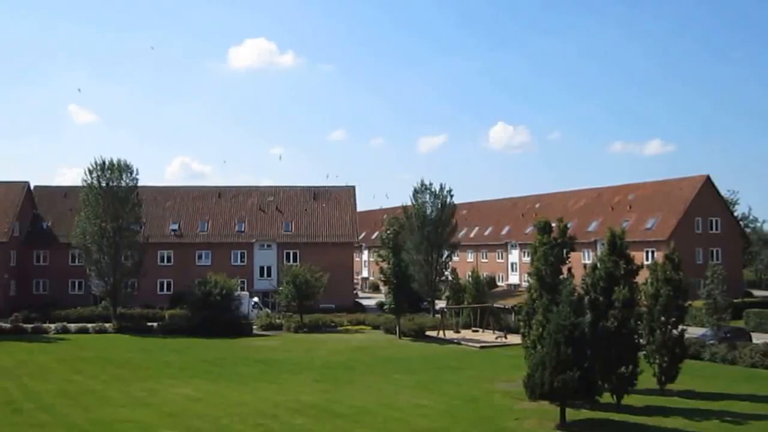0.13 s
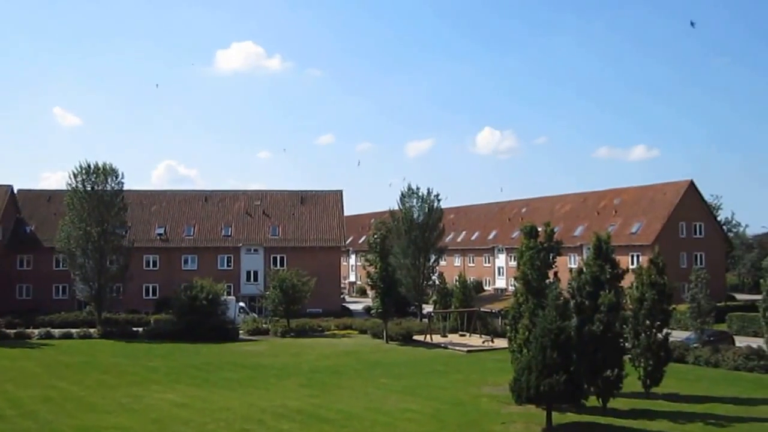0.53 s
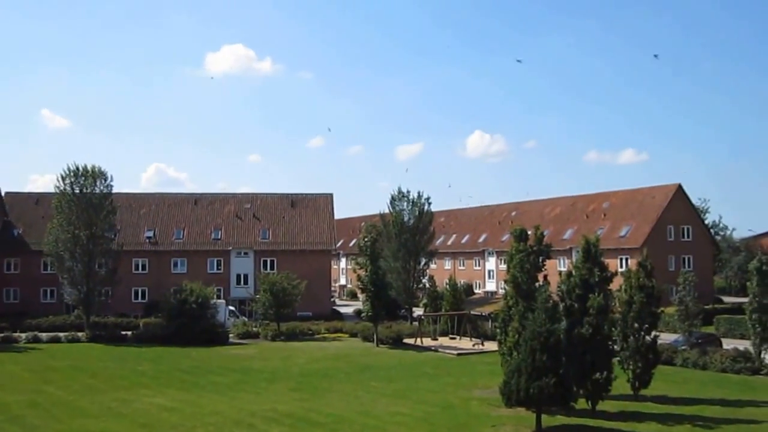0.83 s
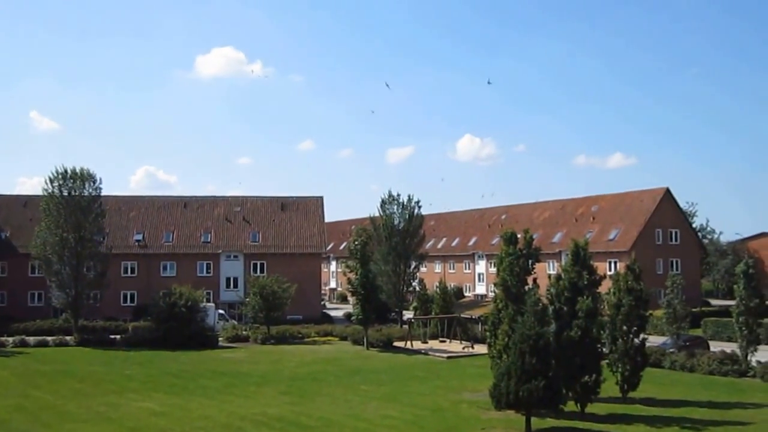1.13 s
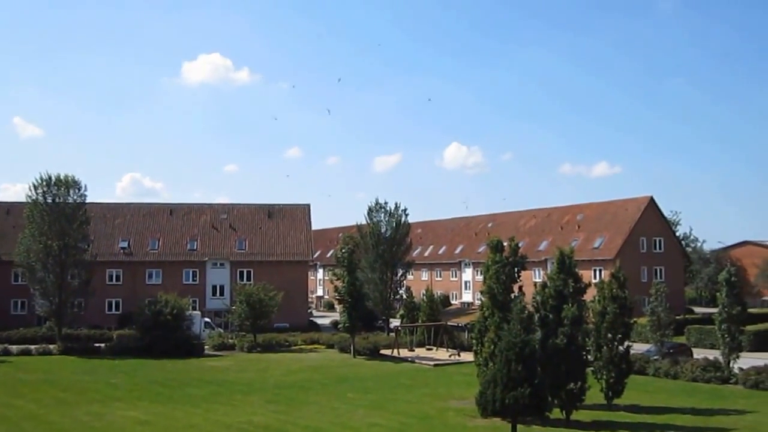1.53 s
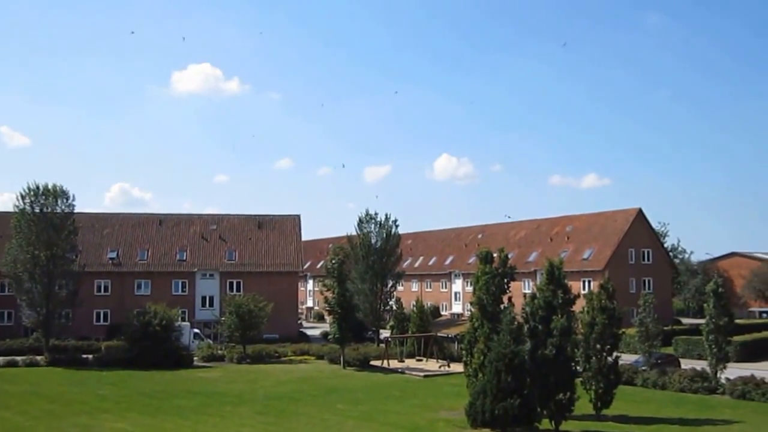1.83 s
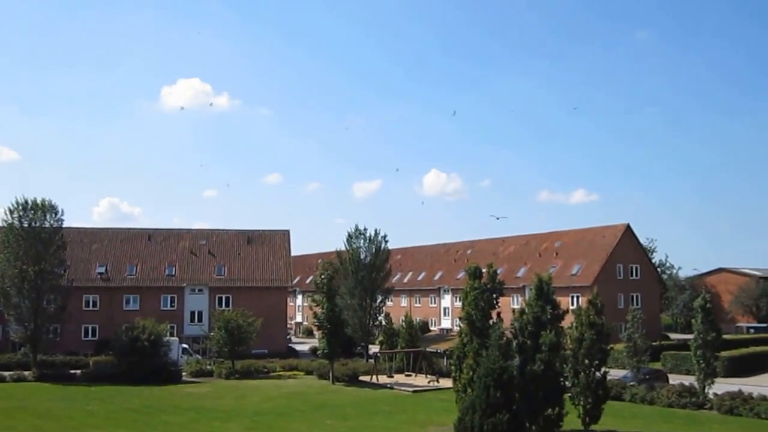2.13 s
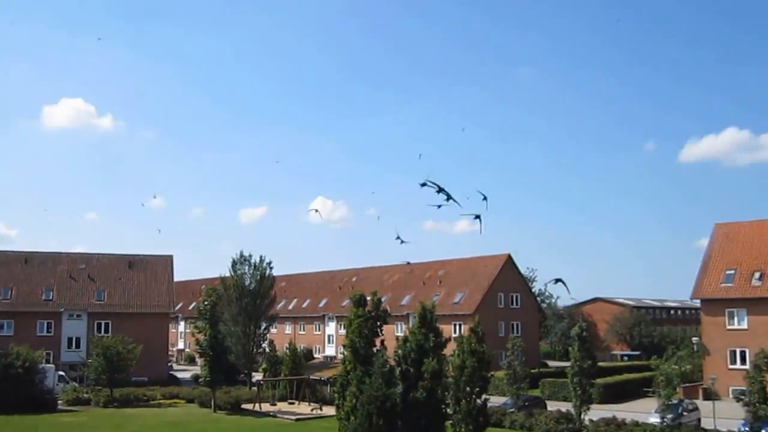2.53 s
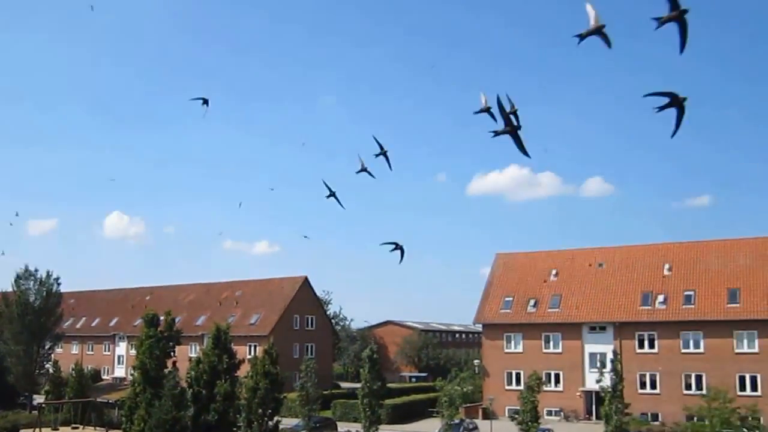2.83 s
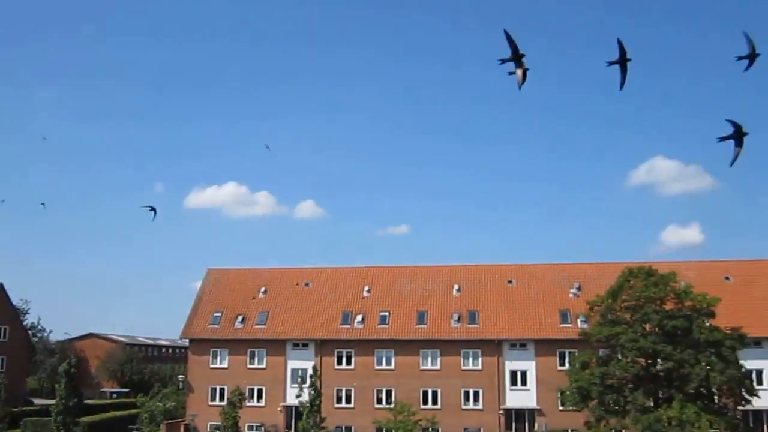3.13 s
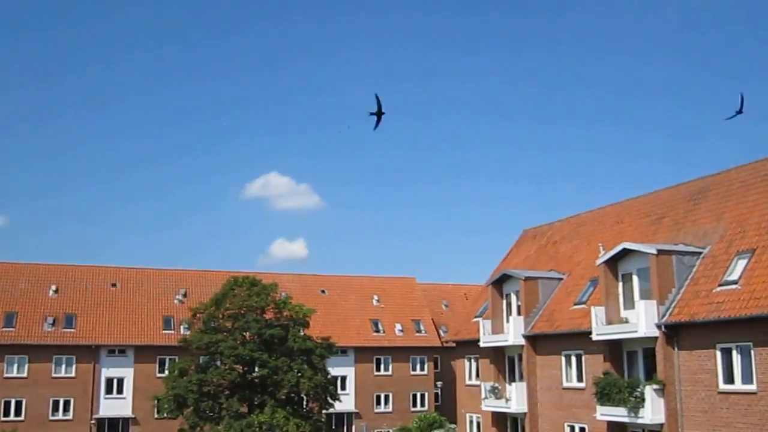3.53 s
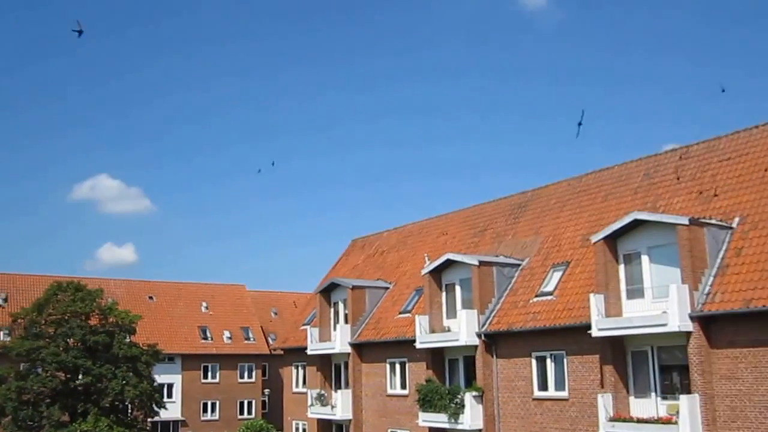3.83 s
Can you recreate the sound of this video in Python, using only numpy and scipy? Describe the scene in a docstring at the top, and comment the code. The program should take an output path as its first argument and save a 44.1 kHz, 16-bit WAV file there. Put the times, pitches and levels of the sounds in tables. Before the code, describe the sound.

Swifts scream shrilly close overhead while wind buffets the microphone over distant traffic.

```python
"""Shrill screams race across a courtyard as a flock of swifts passes close overhead.
Each scream scoops up to a whistle, trills by frequency and amplitude modulation, and breaks into a
falling stutter; the nearest birds add sharp chips. The lawn reflects the calls and the house fronts
echo them. Turbulent wind buffets the microphone over a wash of distant traffic."""
import sys
import numpy as np
from scipy import signal
from scipy.fft import rfft, irfft
from scipy.io import wavfile
from scipy.ndimage import map_coordinates

SR = 44100
rng = np.random.default_rng(int(sys.argv[2]) if len(sys.argv) > 2 else 0)


def dump(signal):
    """Clip the signal to [-1, 1] and save it as 16-bit WAV at the path in sys.argv[1]."""
    limited = np.clip(np.atleast_2d(signal).T, -1, 1)
    pcm = np.round(limited * 32767).astype(np.int16)
    wavfile.write(sys.argv[1], SR, pcm)


N = 176400

# Spectrum of the distant traffic (frequency [Hz], gain [dB])
TRAFFIC_SPECTRUM = [(20, 17), (90, 2), (160, 4), (300, -3), (550, 1.5), (950, 2), (1350, 2.5), (2230, -7),
                    (2700, -10.5), (3800, -13.5), (7000, -20.5), (11000, -34.5), (16000, -42)]
# Level of the distant background, ducked by the recorder's gain control after a wind hit and during
# the loudest screams (time [s], level [dB])
DUCKED_BACKGROUND_LEVEL = [(.04, -44.5), (.2, -41), (.66, -40.5), (.70, -42.5), (1.8, -42), (2.22, -40.5),
                           (2.29, -44), (2.52, -41), (2.64, -49), (2.95, -48), (3.15, -44), (3.42, -39.5),
                           (3.5, -41.5), (4, -41.5)]
# Hum and whine in the traffic (frequency [Hz], bandwidth [Hz], level [dB])
WHINE_BANDS = [(86, 14, -51.5), (692, 45, -51.5), (1201, 110, -51)]
# Strength of the wind on the microphone (time [s], relative level [dB])
GUST_LEVEL = [(.04, -55), (.16, -43), (.5, -52), (.68, -37.5), (.85, -35.5), (1.05, -29.5), (1.26, -29),
              (1.34, -36.5), (1.43, -17), (1.57, -33.5), (1.88, -33.5), (1.96, -24.5), (2.1, -38),
              (2.26, -23.5), (2.55, -33.5), (2.78, -40), (2.95, -49), (3.2, -48.5), (3.33, -34),
              (3.52, -40.5), (3.64, -19.5), (3.75, -36), (3.81, -23), (3.9, -39.5), (4, -18)]
# Spectrum of the wind rumble (frequency [Hz], gain [dB])
RUMBLE_SPECTRUM = [(15, -5.5), (35, 7.5), (70, 4), (120, -5), (200, -18), (300, -14), (500, -41),
                   (1000, -43), (8000, -130)]
# Spectrum of the small eddies (frequency [Hz], gain [dB])
EDDY_SPECTRUM = [(30, -3.5), (100, -3), (190, 0), (300, -12), (450, -20), (800, -35), (1500, -79),
                 (8000, -130)]
# Single pressure pulses of the wind (time [s], peak level [dB], width [ms])
BUFFETS = [(0.691, -18, 3.2), (1.013, -23.5, 1.15), (1.162, -15.5, 0.81), (1.274, -16.5, 2.3),
           (1.408, -10, 1.8), (1.4309, -12, 1.2), (1.4344, -9, .9), (1.439, -9.5, 0.81), (1.531, -15, 1.52),
           (1.765, -22, 2.4), (1.954, -20, 2.9), (2.265, -11, 1.07), (2.743, -22, 1.18),
           (3.612, -2.5, 1.08), (3.651, -18, 0.94), (3.696, -13, 0.89), (3.715, -19.5, 0.93),
           (3.782, -21, 1.2), (3.802, -10.5, 1.07), (3.834, -12, 1.5), (3.959, -16, 1.01)]
# Harmonics 1 to 5 of the voice; the second is the heard pitch (relative level [dB])
PARTIALS_DB = [-37, -2, -25.5, -22.5, -43]
# Spectrum of the breath hiss (frequency [Hz], gain [dB])
BREATH_SPECTRUM = [(2000, -14), (2900, -1.5), (3700, 0.5), (4600, 0.5), (5800, -11.5), (7300, 13.5),
                   (9000, -14.5), (10300, 3.5), (12300, -3), (14000, -8), (16000, -24)]
# Resonances of throat and beak (frequency [Hz], gain [dB])
BEAK_RESPONSE = [(2800, -0.5), (3600, -0.5), (4300, 1), (4900, -2.5), (5600, 1), (6450, 2), (7000, -2.5),
                 (7800, 1.5), (9300, 0.5), (10500, 0), (12700, 1), (13700, -6), (15500, -2)]
# Spectrum of the courtyard echo (frequency [Hz], gain [dB])
YARD_RESPONSE = [(2500, 12), (5300, 2.5), (6500, -6), (9000, 1), (12000, -8.5), (15000, -5)]
# Chips of the nearest birds (centre time [s], pitch [Hz], relative level [dB])
CHIPS = [(1.850, 6050, -25), (1.880, 4840, -29), (1.895, 4500, -32), (1.906, 5550, -18.5),
         (2.220, 6000, -17), (2.335, 4480, -31), (2.425, 6350, -17), (2.44, 6240, -19), (2.452, 6150, -18),
         (2.479, 4720, -28), (2.497, 4700, -29), (2.783, 4620, -24), (2.816, 4380, -27.5),
         (2.857, 4780, -29), (2.962, 5000, -31), (2.988, 5500, -41), (3.012, 5250, -32), (3.080, 4090, -29),
         (3.208, 5750, -17.5), (3.234, 5100, -28), (3.643, 6050, -36), (3.656, 6050, -27),
         (3.671, 6000, -27), (3.778, 4800, -32)]
# Screams (start [s], length [s], stutter length [s], pitch [Hz], glide [Hz/s], scoop depth [Hz],
# scoop time [s], trill rate [Hz], relative level [dB], swell [dB/s], odd-partial gain [dB],
# treble gain [dB], echo gain [dB], roughness [0-1])
SCREAMS = [ (-.16, 0.23, 0.042, 6350, -20, 900, 0.018, 264, -40.5, 2, -4, -3, 1.5, .7),
           (0.102, 0.42, 0.13, 5893, -3, 953, 0.04, 265.4, -38.5, -13, 4, -6.5, -3.5, 0.48),
           (0.424, 0.26, 0.011, 5232, 499, 613, 0.017, 268, -35.5, 3, -20, -6, -1.5, 0.41),
           (0.69, 0.16, 0, 6230, 2, 1227, 0.084, 271.7, -26, 43, -1, -1, -13, 0.17),
           (0.788, .255, .11, 6240, -1000, 490, .04, 272, -36.5, 1, -2, 1, -5, 0.38),
           (0.952, 0.27, 0.0063, 5613, -2400, 1222, 0.019, 270.3, -33.5, -13, -11, -0.5, -0.5, 0.09),
           (1.165, .325, 0.017, 5907, 1105, 893, 0.019, 248, -27.5, -8, -3.5, 0.5, -3, 0.2),
           (1.482, 0.39, 0.094, 5867, 1511.5, 1182, .028, 272, -22.5, -12.5, -2.5, 4, -2.5, 0.55),
           (1.526, 0.32, 0.062, 6526, 7.5, 1706, 0.087, 276.7, -24.5, -14, -11, -3, -25, 0.24),
           (1.894, 0.4, 0.024, 6310, -1900, 1400, .016, 278, -21.5, -17, -6, 3.5, -0.5, 0.2),
           (1.934, 0.22, 0.054, 5800, -10, 1300, 0.035, 264.4, -27.5, -9, -2, 4.5, -10, 0.35),
           (2.176, .30, .085, 6458, 14.5, 1694, 0.033, 278, -15.5, -15, -14, 1, -13.5, 0.1),
           (2.215, 0.36, .05, 5676, 1591, 1208, 0.022, 291.4, -25, -25, 3, 0, -19, 0.01),
           (2.487, 0.38, 0.084, 6310, 292, 1700, 0.03, 263, -15.5, -24.5, 3, 3.5, -9.5, 0.45),
           (2.512, 0.4, 0.14, 5750, 289, 785, 0.02, 243, -23, -45, -2, 2, -25, 0.57),
           (2.808, .27, 0.035, 6370, -400, 1393, 0.032, 267.5, -17, -66, -8, 3.5, -8, 0.12),
           (2.884, 0.25, .03, 5754, 384, 1277, 0.016, 258.8, -19, -28, 1, -3, -24, 0.31),
           (3.037, .21, 0.049, 5590, -7, 999, 0.019, 234, -19.5, -28, 2, -3.5, -18, 0.26),
           (3.078, 0.27, 0.044, 5690, 2, 1402, 0.015, 228.7, -25, -41, 3.5, 2.5, -4, 0.53),
           (3.309, 0.075, 0.013, 6430, 0, 710, 0.012, 268, -25.5, 0, -12, -12, 3, 0.47),
           (3.356, 0.31, .09, 5860, 3007, 201, 0.0232, 238.6, -28.5, -53, -1, -5.5, 2, 0.42),
           (3.345, 0.27, .03, 5490, -14, 1400, .04, 227.7, -28, -21, 7.5, 1, -6.5, 0.57),
           (3.67, 0.32, 0.032, 5447, 396, 1151, .04, 221.2, -21.5, -28, 4, -6, -9.5, 0.43),
           (3.75, 0.44, .02, 6050, 22, 1116, 0.041, 235, -34, -22, 1.5, -0.5, 9, 0.78), ]


def undb(db):
    """Amplitude ratio of a level in decibels."""
    return 10 ** (np.asarray(db) / 20)


def curve(t, rows):
    """Linear interpolation through (time [s], value) rows."""
    return np.interp(t, *np.array(rows).T)


def colour(x, rows):
    """Zero-phase filtering by (frequency [Hz], gain [dB]) rows."""
    hz, db = np.array(sorted(rows)).T
    bins_hz = np.fft.rfftfreq(len(x), 1 / SR)
    gain = undb(np.interp(np.log(bins_hz + 1), np.log(hz), db))
    return irfft(rfft(x) * gain, len(x))


def noise(spectrum):
    """Spectrally shaped Gaussian noise of rms 1."""
    x = colour(rng.standard_normal(N), spectrum)
    return x / np.sqrt(np.mean(x ** 2) + 1e-20)


def walk(t, rate_hz):
    """Smooth random modulation with a spread near 1."""
    return map_coordinates(rng.standard_normal(4096), [(t - t[0]) * rate_hz], order=3, mode="wrap")


def traffic(t):
    """Superposition of a distant broadband wash and a narrowband whine that soon falls to a quarter."""
    wash = noise(TRAFFIC_SPECTRUM) * undb(curve(t, DUCKED_BACKGROUND_LEVEL) + 0.86 * walk(t, 14))
    whine = np.zeros(N)
    for hz, width_hz, db in WHINE_BANDS:
        phase = 2 * np.pi * hz * t
        whine += undb(db) * (walk(t, width_hz) * np.sin(phase) + walk(t, width_hz) * np.cos(phase))
    return wash + whine * np.clip((0.84 - t) / 0.19, .25, 1)


def wind(t):
    """Turbulent pressure on the microphone: rumble, small eddies and push-pull buffets."""
    strong_gust_db, eddy_growth = -22, 1.72  # eddies grow faster than the gust
    gust_db = curve(t, GUST_LEVEL) + 2.3 * walk(t, 28)
    rumble = undb(gust_db - 0.5) * noise(RUMBLE_SPECTRUM)
    eddy_db = strong_gust_db - 4 + eddy_growth * (gust_db - strong_gust_db) + 2.5 * walk(t, 70)
    pressure = rumble + undb(eddy_db) * noise(EDDY_SPECTRUM)
    for at, db, width_ms in BUFFETS:
        u = (t - at) / (width_ms / 1000)
        pressure -= undb(db) * 1.7 * u / (1 + u * u / 5) ** 3
    return pressure


def courtyard_echo(t, sound):
    """Reverberation between house fronts: convolution with exponentially decaying noise."""
    t60_s, build_up_s = 1, 0.015
    tail = rng.standard_normal(N) * undb(-60 * t / t60_s) * np.minimum(t / build_up_s, 1)
    response = colour(tail / np.linalg.norm(tail), YARD_RESPONSE)[:N // 2]
    return signal.fftconvolve(sound, response)[:N]


def lawn_bounce(t, sound):
    """Ground reflection: a weaker copy with a wandering delay."""
    delay_s = .0047 * (1 + 0.0484 * walk(t, 3))
    return undb(-12) * map_coordinates(sound, [(t - delay_s) * SR], order=3)


def voice(hz, odd_db, treble_db):
    """A harmonic series on half the heard pitch; far or averted birds lose treble."""
    phase = 2 * np.pi * np.cumsum(hz / 2) / SR
    return np.sqrt(2) * sum(undb(db + odd_db * (n % 2) + treble_db * (n > 2)) * np.sin(n * phase)
                            for n, db in enumerate(PARTIALS_DB, start=1))


def chips(t, hiss):
    """Steep downward frequency sweeps under Gaussian envelopes a few milliseconds long."""
    width_s, fall_hz_per_s = .0024, 89500
    out = np.zeros(N)
    for at, hz, db in CHIPS:
        on = abs(t - at) < 4 * width_s
        offset_s = t[on] - at
        tone = voice(hz - fall_hz_per_s * offset_s, odd_db=0, treble_db=0.93)
        out[on] += undb(db) * np.exp(-(offset_s / width_s) ** 2) * (tone + undb(-23) * hiss[on])
    return out


def scream(t, hiss, length, stutter_s, pitch, glide, scoop_hz, scoop_s, trill_hz,
           db, swell, odd_db, treble_db, roughness):
    """Frequency and amplitude modulation turn a rising whistle into a trill, then a falling stutter."""
    attack_s, release_s, trill_onset_s = .02, .018, .055
    trill_swing_hz, trill_depth = 165, .45
    stutter_hz, stutter_swing_hz, sag_hz = 77.64, 783, 444.6
    scoop = np.exp(-t / scoop_s)
    trilling = 1 - np.exp(-(t / trill_onset_s) ** 2)
    stutter_progress = np.clip((t - length + stutter_s) / max(stutter_s, .005), 0, 1)
    broken = np.minimum(stutter_progress * 3, 1)
    trill_phase = 2 * np.pi * np.cumsum(trill_hz * (1 + .02 * walk(t, 55.2))) / SR
    stutter_phase = 2 * np.pi * np.cumsum(stutter_hz * (1 + 0.0757 * walk(t, 39.53))) / SR

    hz = pitch + glide * t - scoop_hz * scoop - sag_hz * stutter_progress
    hz += trilling * trill_swing_hz * (1 - .5 * broken) * np.sin(trill_phase)
    hz -= stutter_swing_hz * broken * np.sin(stutter_phase)
    hz += 28 * walk(t, 49.63) + (.5 + .5 * trilling) * roughness * 125 * walk(t, 700)  # wander, rasp
    crack = np.sqrt(roughness) * np.maximum(walk(t, 330) - 1.45, 0)
    hz -= 1100 * crack  # now and then the voice cracks downward
    fading_odd_db = odd_db - 40 * t + 5.5 * walk(t, 491)
    tone = voice(hz, fading_odd_db, treble_db)
    breath = undb(-34) * (1 + 2 * broken) * hiss

    tremolo = 1 + trilling * trill_depth * np.sin(trill_phase + 1.34)
    pulses = undb(6) * (.5 + .5 * np.cos(stutter_phase)) ** 6.8
    modulation = tremolo * (1 - broken + broken * pulses)
    envelope = np.clip(t / attack_s, 0, 1) * np.clip((length - t) / release_s, 0, 1)
    level_db = db - 2.5 + swell * (t - length / 2) - 10.5 * scoop - 6 * crack
    level_db += 1.8 * walk(t, 42.1) + roughness * 4.5 * walk(t, 246.7)  # flutter, rasp
    return (tone + breath) * modulation * envelope * undb(level_db)


def swifts(t):
    """Source and filter: direct and reflected calls all carry the resonances of throat and beak."""
    hiss = noise(BREATH_SPECTRUM)
    direct = chips(t, hiss)
    to_walls = undb(-12) * direct
    for start, length, *settings, echo_db, roughness in SCREAMS:
        on = (t >= start) & (t < start + length)
        call = scream(t[on] - start, hiss[on], length, *settings, roughness)
        direct[on] += call
        to_walls[on] += undb(echo_db) * call
    echo = courtyard_echo(t, to_walls)
    return colour(direct + lawn_bounce(t, direct) + echo, BEAK_RESPONSE)


def scene():
    """Superposition of swifts, traffic and wind at one microphone."""
    t = np.arange(N) / SR
    return (swifts(t) + traffic(t) + wind(t))[None]


def record(dry):
    """Clipping at full scale and low-pass filtering, after a brief opening silence."""
    silence_s, cutoff_hz = .036, 15500
    clipped = np.clip(dry, -1, 1) * (np.arange(N) / SR >= silence_s)
    return signal.sosfilt(signal.ellip(8, .2, 70, cutoff_hz, fs=SR, output="sos"), clipped)


dry = scene()
out = record(dry)
dump(out)
```